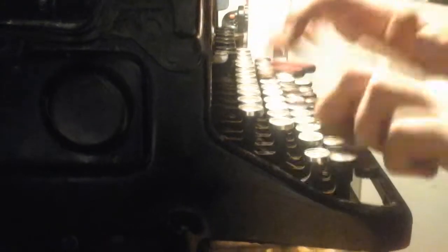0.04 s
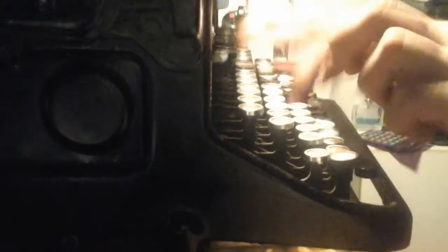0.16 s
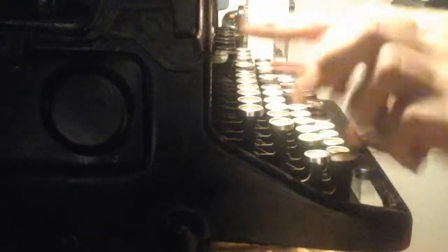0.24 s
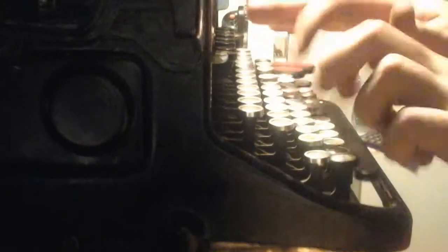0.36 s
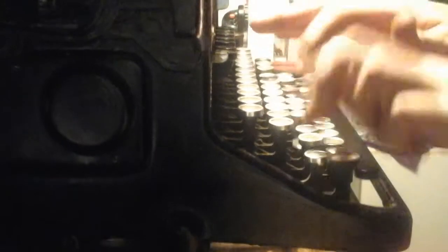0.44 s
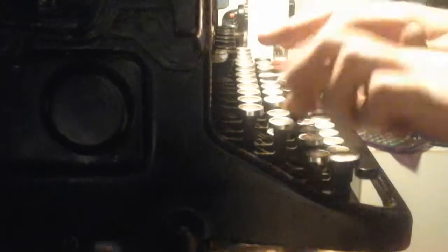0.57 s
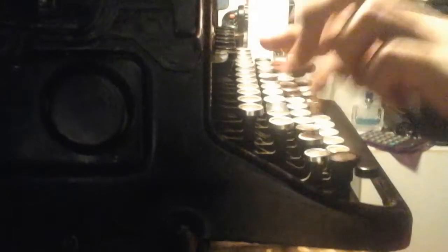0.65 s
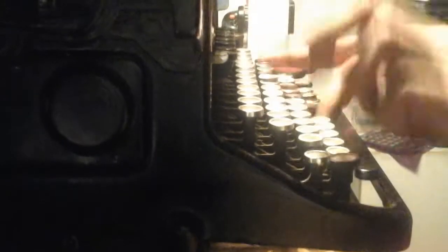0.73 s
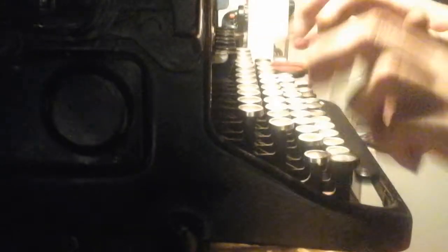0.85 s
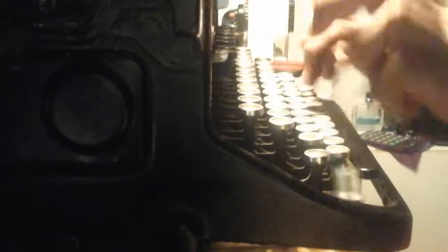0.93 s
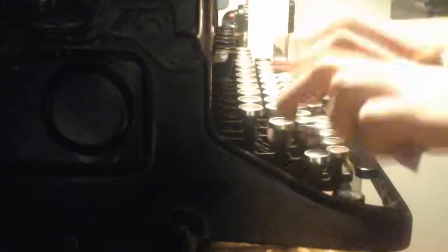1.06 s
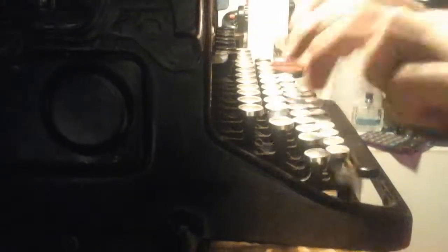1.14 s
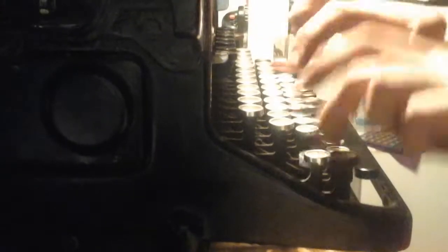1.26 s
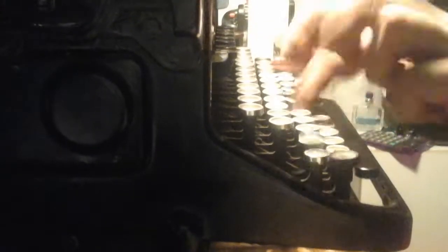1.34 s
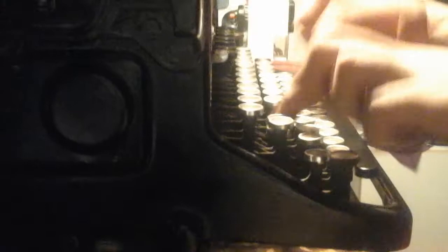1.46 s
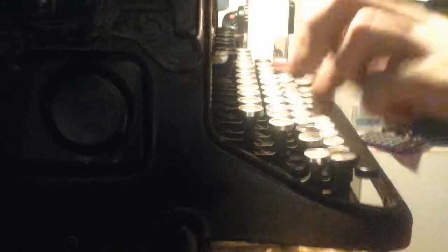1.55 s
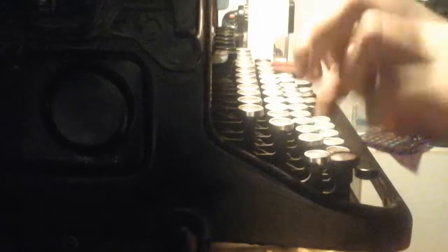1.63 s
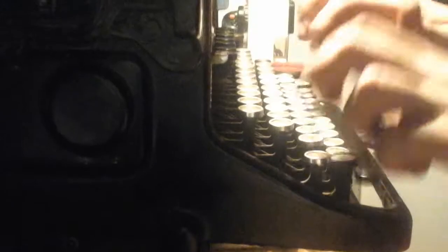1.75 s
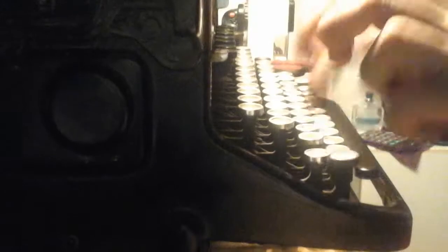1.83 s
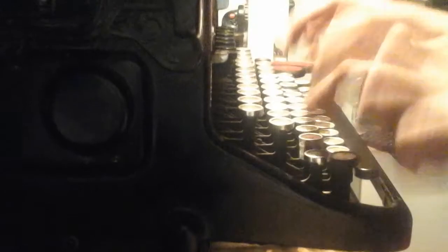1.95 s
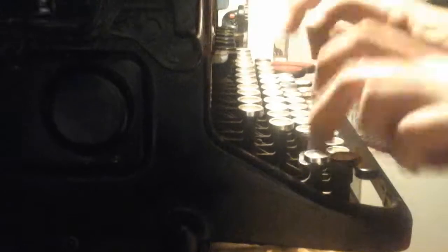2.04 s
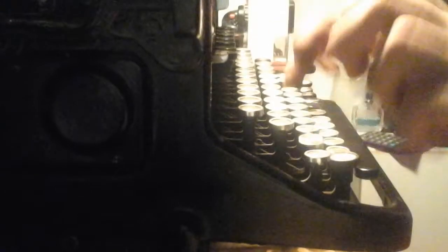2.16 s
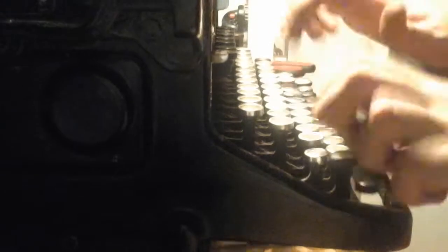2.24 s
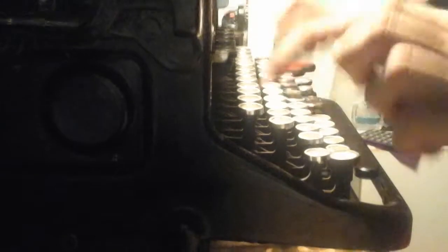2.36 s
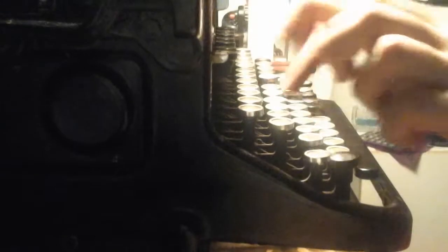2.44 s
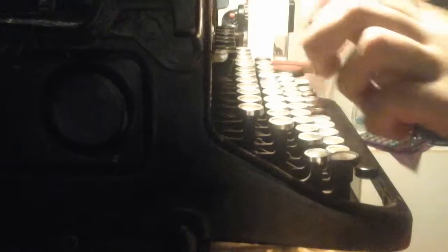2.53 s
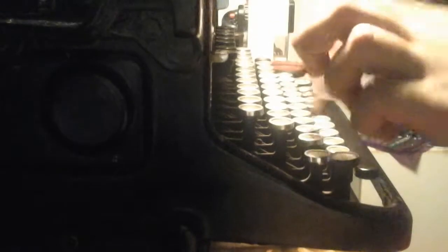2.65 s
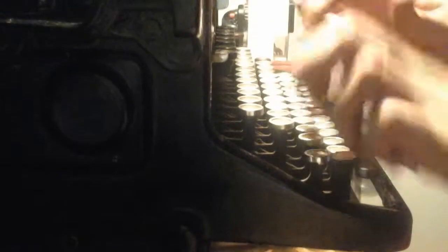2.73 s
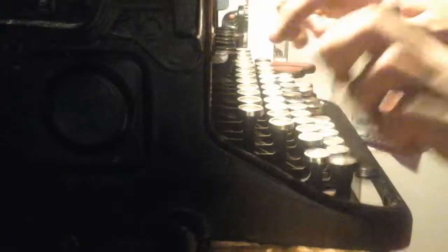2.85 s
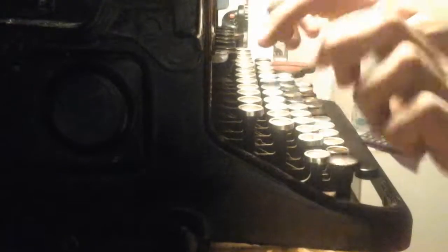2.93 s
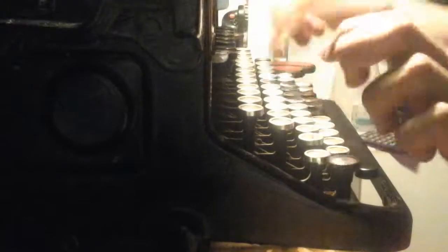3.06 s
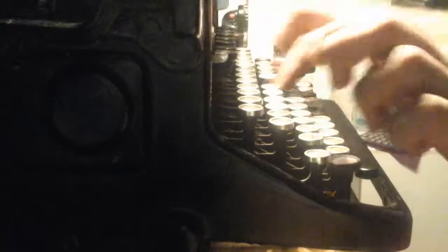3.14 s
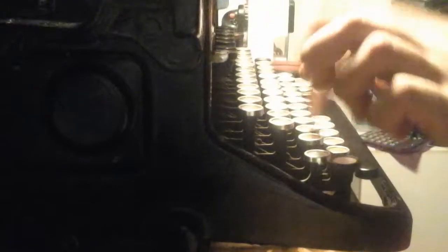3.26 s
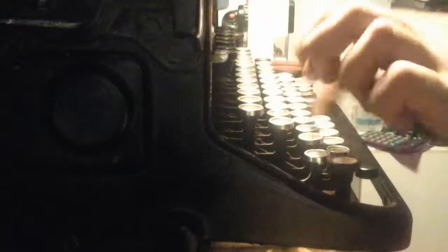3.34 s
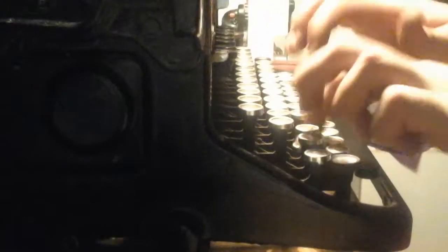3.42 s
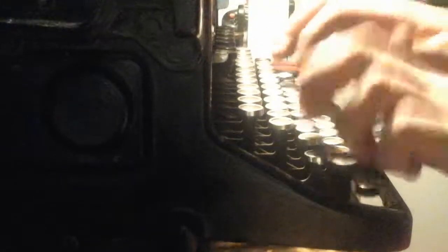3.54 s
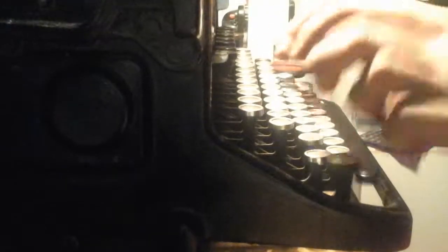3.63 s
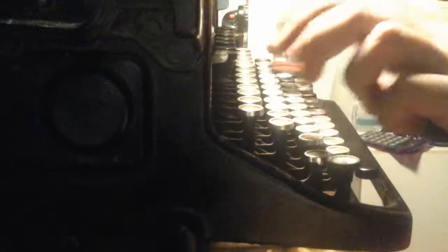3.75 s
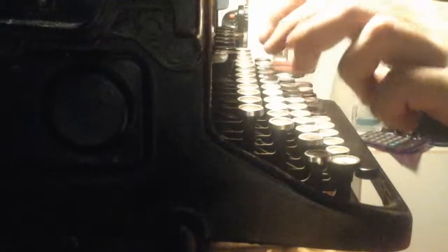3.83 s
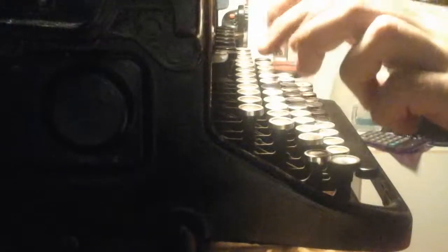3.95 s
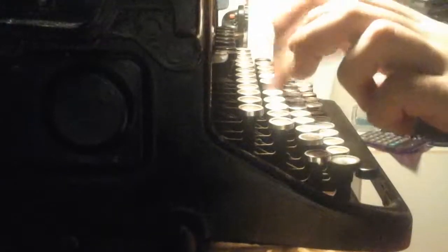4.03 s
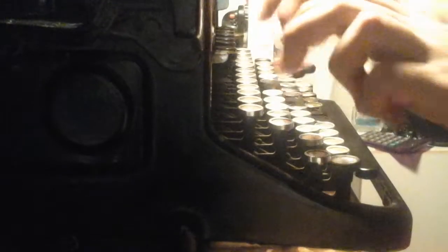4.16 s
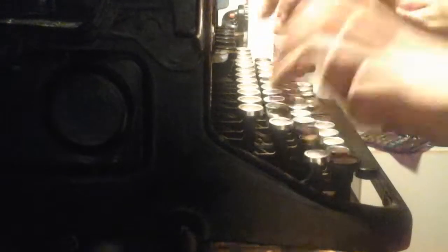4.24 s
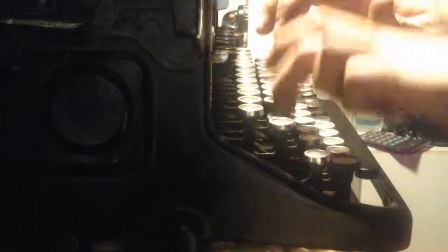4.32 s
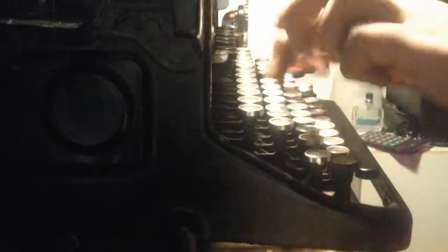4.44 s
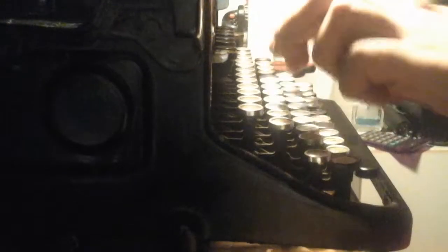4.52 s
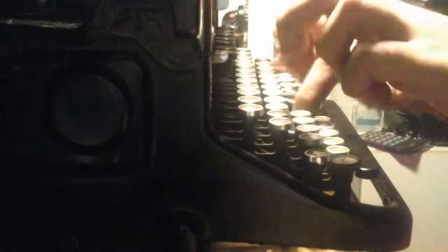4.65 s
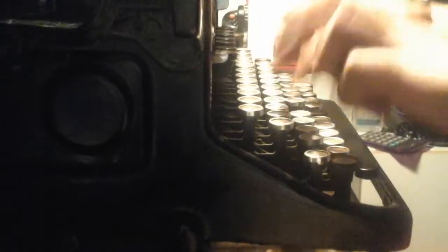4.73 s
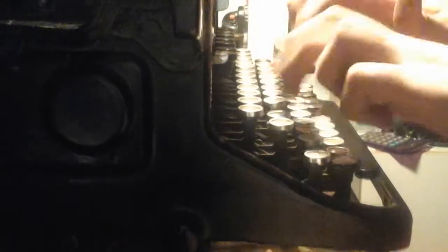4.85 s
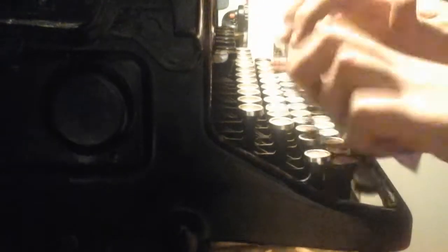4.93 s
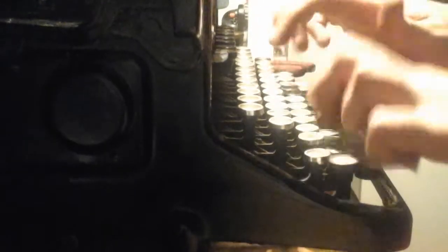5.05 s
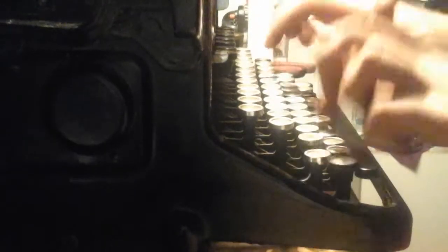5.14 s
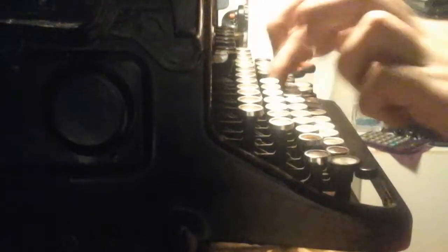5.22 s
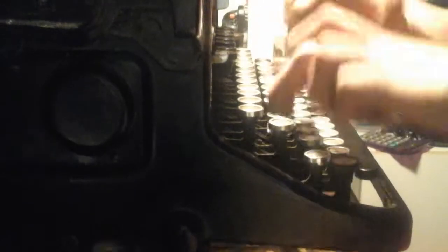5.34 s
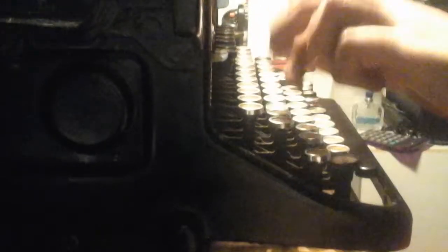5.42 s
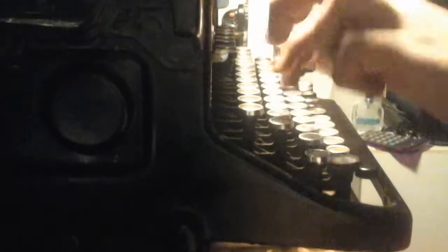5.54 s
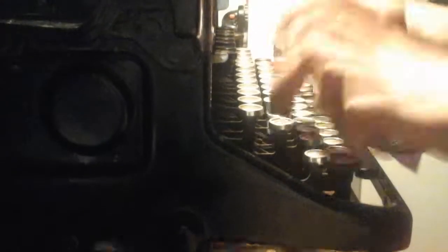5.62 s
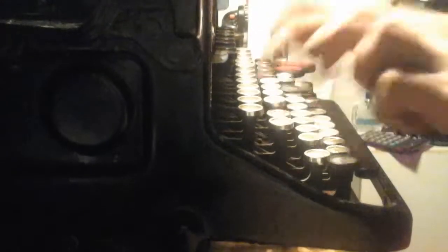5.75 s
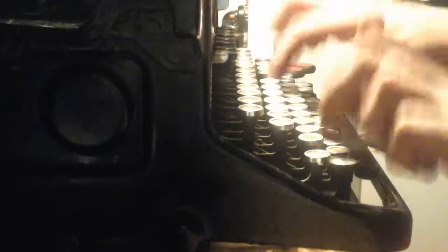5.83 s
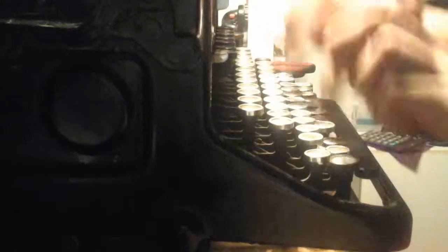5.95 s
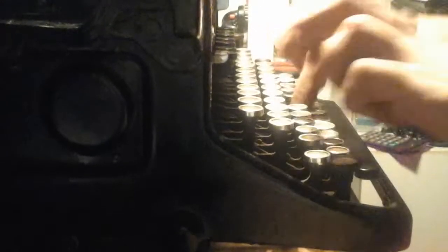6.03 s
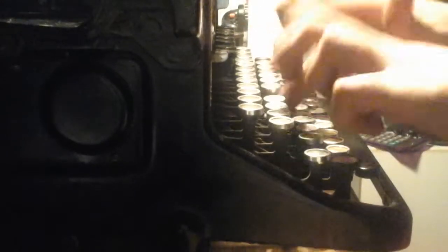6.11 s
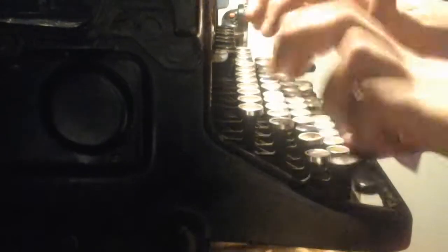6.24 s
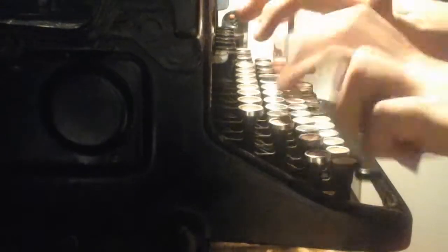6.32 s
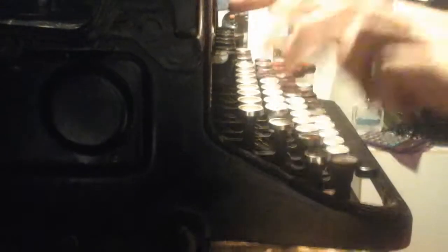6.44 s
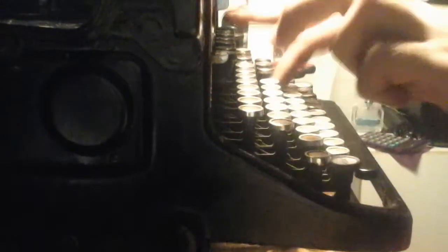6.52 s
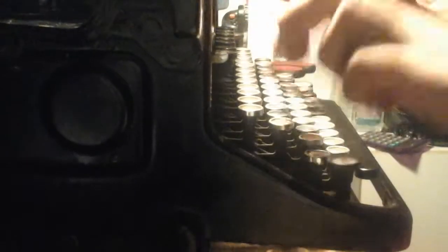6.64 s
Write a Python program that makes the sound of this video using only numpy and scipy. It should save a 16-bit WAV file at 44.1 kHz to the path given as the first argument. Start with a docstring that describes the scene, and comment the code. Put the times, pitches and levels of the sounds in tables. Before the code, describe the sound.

Fast, uneven clatter of an old iron typewriter, typebars snapping on the platen over deep wooden thumps, with ringing space strokes and brief gaps.

```python
"""Fast typing on a heavy manual typewriter, heard from very close beside its iron frame in a small room.
Each letter's typebar clacks on the platen, snaps, sizzles and rings at its own pitch; thuds rock desk and frame.
The space bar rings and bounces between words, levers knock and tick, the shift drops once, loose parts rattle.
Every blow sums decaying sine modes of the struck body; noise-made reflections and a low rumble add the room."""
import sys
import numpy as np
from scipy import signal
from scipy.fft import rfft, irfft
from scipy.io import wavfile
from scipy.ndimage import uniform_filter1d

SR = 44100
rng = np.random.default_rng(int(sys.argv[2]) if len(sys.argv) > 2 else 0)


def master(y):
    """Save y as 16-bit WAV."""
    cut = np.clip(np.atleast_2d(y).T, -1, 1)
    pcm = np.round(cut * 32767)  # scale
    wavfile.write(sys.argv[1], SR, pcm.astype(np.int16))


N = 294588
TIME = np.arange(N) / SR   # s
# In all tables rel_db is a relative level, trimmed or normalised where it is played.


def from_db(db):
    """Decibels to amplitude ratio."""
    return 10 ** (np.asarray(db) / 20)


def rms_one(x):
    """Scale to unit RMS."""
    return x / np.sqrt(np.mean(x ** 2, axis=-1, keepdims=True) + 1e-20)


def at_hz(points, hz):
    """Interpolate (Hz, value) points along log frequency."""
    points_hz, values = np.array(points).T
    return np.interp(np.log(hz), np.log(points_hz), values)


def dense_modes(colour, t60, count):
    """Many unrelated steel modes that share a colour; t60 (s) holds at 1 kHz and higher modes die sooner."""
    spread = np.exp(rng.normal(0, 1, count) / count)
    hz = np.geomspace(colour[0][0], colour[-1][0], count) * spread
    khz = hz / 1000
    db = at_hz(colour, hz) + 10 * np.log10(khz)   # log spacing: each mode covers a band in proportion to hz
    return np.column_stack([hz, db, t60 / khz ** 0.64])


def rings(modes, contact_s, length_s, aim, count):
    """One ring per blow, of unit strength; each weights the modes anew, the more alike the steadier its aim."""
    hz, db, t60 = np.transpose(modes)[:, :, None]
    t = np.arange(int(length_s * SR)) / SR
    waves = from_db(db - 60 * t / t60) * np.sin(2 * np.pi * hz * t)
    weights = np.cbrt(aim + rng.standard_normal((count, len(modes))))
    onset = 1 - np.exp(-(t / contact_s) ** 2)
    fade_out = np.minimum(1, 10 * (1 - t / length_s))
    out = weights @ waves * onset * fade_out
    power = uniform_filter1d(out ** 2, SR // 200, axis=1, mode="constant")   # 5 ms window
    return out / np.sqrt(power.max(axis=1, keepdims=True))


def play(times, db, modes, contact_s, length_s, aim=0):
    """Strike a body at the given times and levels."""
    out = np.zeros(N + 2 * SR)   # 1 s margin at each end
    blows = rings(modes, contact_s, length_s, aim, count=len(times))
    for s, gain, ring in zip(times, from_db(db), blows):
        start = SR + int(np.clip(s * SR, -SR, N))
        out[start:start + len(ring)] += gain * ring
    return out[SR:SR + N]


def rebounding(times, db, gap_s, loss_db, count):
    """Turn each blow into count blows at uneven gaps, each loss_db weaker (stronger if negative)."""
    gaps = gap_s * (.5 + rng.random((len(times), count)))
    delays = np.cumsum(gaps, axis=1) - gaps[:, :1]
    levels_db = db[:, None] - loss_db * np.arange(count)
    return (times[:, None] + delays).ravel(), levels_db.ravel()


def gather(*blows):
    """Join several kinds of blow, each given as times and levels, into columns."""
    return np.hstack([np.broadcast_arrays(*blow) for blow in blows])


# background spectrum: freq_hz, rel_db
ROOM_NOISE_SPECTRUM = [(25, -13.5), (60, -1.5), (130, 8), (220, -2.5), (400, -21.5), (1000, -41),
                       (2500, -48.5), (7000, -59), (13000, -69.5)]


def room_noise(level_db):
    """A low, steady background rumble: noise shaped in frequency, at level_db RMS."""
    hz = np.maximum(np.arange(N // 2 + 1) * SR / N, 1)
    shaped = rfft(rng.standard_normal(N)) * from_db(at_hz(ROOM_NOISE_SPECTRUM, hz))
    return from_db(level_db) * rms_one(irfft(shaped, N))


# room decay: freq_hz, t60_s
ROOM_DECAY = [(80, .55), (500, .33), (2500, .25), (8000, .26)]


def room(x):
    """Diffuse reflections: octave bands of noise, the bass dying away slowest."""
    t = TIME[:SR // 2]
    response = 0
    for hz in 62.5 * 2 ** np.arange(8):
        band = signal.butter(2, [hz / np.sqrt(2), hz * np.sqrt(2)], "band", fs=SR, output="sos")
        decay = from_db(-60 * t / at_hz(ROOM_DECAY, hz))
        response = response + signal.sosfilt(band, rng.standard_normal(len(t))) * decay
    response = response * (1 - np.exp(-(t / 0.016) ** 2))   # gradual build-up
    response = response / np.sqrt(2 * np.sum(response ** 2))
    eased = x * np.minimum(1, TIME / .01) ** 2
    return signal.fftconvolve(eased, response)[:N]


# keys bottoming, keys let go, carriage stopping: thud_s, desk_rel_db, frame_rel_db
THUD_BLOWS = [(-0.004, -4, -11), (0.017, -7, -7.5), (0.045, -9.5, -11.5), (0.091, -8.5, -13),
              (0.127, -6, -9.5), (0.213, -5, -17.5), (0.262, -20.5, -9), (0.317, -22.5, -18),
              (0.347, -8, -9.5), (0.382, -16.5, -9), (0.417, -7.5, -32.5), (0.461, -7.5, -11),
              (0.524, -9, -18), (0.577, -6.5, -11.5), (0.632, -9.5, -9), (0.682, -17, -9.5),
              (0.734, -6.5, -9), (0.778, -14, -6.5), (0.842, -7, -8.5), (0.885, -7, -10),
              (0.922, -8, -13.5), (0.967, -6.5, -5.5), (1.036, -2.5, -5), (1.077, -8, -30.5),
              (1.133, -11, -12), (1.217, -7, -12.5), (1.268, -8, -10.5), (1.311, -15, -11),
              (1.396, -8.5, -12.5), (1.421, -34, -9.5), (1.495, -8.5, -13), (1.539, -7.5, -14.5),
              (1.629, -11, -7.5), (1.676, -11.5, -14.5), (1.756, -16.5, -6), (1.825, -11.5, -17),
              (1.872, -12, -11), (1.903, -12, -14), (1.946, -31, -9.5), (2.058, -6.5, -9),
              (2.116, -8.5, -13.5), (2.167, -6, -10.5), (2.212, -5.5, -9.5), (2.291, -8, -7),
              (2.341, -6.5, -6.5), (2.396, -9, -8.5), (2.456, -4.5, -10), (2.521, -18, -10),
              (2.571, -6, -11.5), (2.609, -12.5, -8), (2.65, -32.5, -4), (2.688, -10, -14), (2.758, -4, -7),
              (2.818, -9, -8), (2.846, -13, -10), (2.895, -12, -11.5), (2.932, -6.5, -11),
              (2.971, -14.5, -13.5), (3.002, -16, -18), (3.153, -18, -5.5), (3.183, -16.5, -6),
              (3.224, -17.5, -11.5), (3.286, -5, -10), (3.331, -14, -6.5), (3.366, -14, -8.5),
              (3.451, -30, -9), (3.475, -4.5, -9), (3.521, -13.5, -27), (3.569, -4.5, -7.5),
              (3.61, -9, -6.5), (3.653, -13, -17.5), (3.687, -12.5, -11.5), (3.722, -12, -14.5),
              (3.753, -14, -8), (3.8, -20.5, -16), (4.108, -10, -8), (4.14, -18, -7.5), (4.246, -5.5, -9.5),
              (4.306, -11, -13.5), (4.34, -27, -3.5), (4.38, -20.5, -10), (4.45, -6.5, -8.5),
              (4.494, -29, -6.5), (4.536, -9, -15.5), (4.608, -4, -5.5), (4.666, -9, -13),
              (4.704, -19.5, -5.5), (4.762, -17.5, -14), (4.822, -5, -12.5), (4.852, -34.5, -7),
              (4.886, -17, -17), (4.931, -6, -11.5), (4.976, -11.5, -6), (5.057, -13, -8), (5.1, -17, -6.5),
              (5.142, -12.5, -5), (5.228, -7, -25.5), (5.265, -11, -10), (5.345, -7.5, -11),
              (5.383, -14.5, -11), (5.418, -14.5, -11.5), (5.466, -6.5, -17), (5.504, -11, -13.5),
              (5.57, -12.5, -9.5), (5.6, -7.5, -12.5), (5.647, -9.5, -10.5), (5.694, -8.5, -12.5),
              (5.741, -10.5, -9), (5.787, -15, -20.5), (5.826, -6.5, -9.5), (5.861, -8.5, -16),
              (5.904, -8.5, -14), (5.947, -9.5, -9.5), (5.978, -8.5, -16.5), (6.013, -16, -7.5),
              (6.053, -5.5, -10.5), (6.083, -11, -7), (6.149, -12.5, -9), (6.199, -9, -6),
              (6.278, -5, -9.5), (6.324, -14, -11), (6.38, -6.5, -13), (6.409, -6.5, -7.5),
              (6.443, -16, -8), (6.478, -11, -27), (6.528, -3.5, -9.5), (6.578, -10.5, -12),
              (6.643, -18, -5)]


def shake(times, fall_db_per_s):
    """How hard the machine is shaking (dB): the largest remainder of the earlier thuds, each falling steadily."""
    s, desk_db, frame_db = np.transpose(THUD_BLOWS)
    age_s = times[:, None] - s
    left_db = np.maximum(desk_db, frame_db) - fall_db_per_s * age_s
    return np.where(age_s > 0, left_db, -100).max(axis=1)


# colour of knocks: freq_hz, rel_db_per_hz
KNOCK_COLOUR = [(230, 11.5), (330, 11), (450, 2), (620, 8.5), (760, -3), (960, 2), (1200, -6.5), (1480, -3),
                (1800, -21.5), (2250, -18.5), (3200, -31), (4500, -33.5)]
# colour of dry metal ticks: freq_hz, rel_db_per_hz
TICK_COLOUR = [(600, 10), (1000, 10), (1500, 10.5), (2400, 6.5), (3300, 2.5), (4300, 2), (5200, -7),
               (6400, -6.5), (7300, 7), (8500, -12), (13000, -31)]


def loose_parts():
    """Springs and links chatter at random times, as hard as the machine is being shaken."""
    times = rng.uniform(0, TIME[-1], size=1150)
    sizes_db = shake(times, fall_db_per_s=180) + rng.uniform(-9, 3, len(times))
    link_modes = dense_modes(KNOCK_COLOUR, t60=0.026, count=110)
    spring_modes = dense_modes(TICK_COLOUR, t60=0.0088, count=90)
    links = play(times, sizes_db - 21.5, link_modes, contact_s=.003, length_s=0.029)
    springs = play(times, sizes_db - 45.5, spring_modes, contact_s=0.0015, length_s=.018)
    return links + springs


# colour of small steel links: freq_hz, rel_db_per_hz
JINGLE_COLOUR = [(2500, -1.5), (3300, -2.5), (4300, 2), (5100, -11.5), (6300, -1), (7300, 3), (8200, -11)]


def jingle():
    """Small steel links tinkle at random times, following the shaking with uneven strength."""
    times = rng.uniform(0, TIME[-1], size=260)
    extra_db = 2.4 * np.minimum(rng.exponential(1, len(times)), 3)
    sizes_db = shake(times, fall_db_per_s=132) + extra_db
    modes = dense_modes(JINGLE_COLOUR, t60=.025, count=90)
    return play(times, sizes_db - 62.5, modes, contact_s=.001, length_s=0.029)


# shift dropping onto its stop: hit_s, rel_db
SHIFT_HITS = [(1.0288, -11.5), (1.034, -10), (1.04, -17.5), (1.046, -21.5), (1.051, -25)]
# colour of that clatter: freq_hz, rel_db_per_hz
DROP_COLOUR = [(220, 18.5), (380, 11.5), (700, -4.5), (950, 9), (1250, -14), (1500, -3), (1800, -2.5),
               (2400, -9), (2700, -20.5), (4400, -28.5), (5500, -51)]
# iron frame modes: freq_hz, rel_db, t60_s
FRAME_MODES = [(137.7, -3, 0.11), (159.9, 1.5, 0.12), (175, 1.5, 0.11), (192.5, -1.5, 0.093),
               (234.6, -7, 0.11), (251.2, -14.5, 0.1), (312.4, -19, 0.092), (350.5, -25, 0.14)]


def shift():
    """A heavy, hard clatter of dense modes, after which the frame booms on."""
    s, db = np.transpose(SHIFT_HITS)
    # the carriage settles
    boom = play(s[:1] + 0.038, [-9], FRAME_MODES, contact_s=0.019, length_s=.2, aim=0.91)
    drop_modes = dense_modes(DROP_COLOUR, t60=0.03, count=120)
    return boom + play(s, db - 6.5, drop_modes, contact_s=0.0014, length_s=0.088)


# levers knocking, typebars falling back on their rest: hit_s, knock_rel_db, tick_rel_db
LEVER_HITS = [(0.2097, -35, -66), (0.2225, -30.0, -76), (0.3431, -27.5, -69), (0.3833, -35, -54.5),
              (0.4248, -26.5, -64.5), (0.4629, -31, -66.5), (0.589, -35.5, -62.5), (0.6128, -31.5, -61),
              (0.7556, -23.5, -52.5), (0.8361, -30, -67), (0.8554, -30.5, -65.5), (0.8881, -31, -58.5),
              (0.9015, -30, -62), (0.9867, -28, -65), (1.1254, -26, -63.5), (1.251, -32.5, -64),
              (1.418, -29, -57.5), (1.7562, -25.5, -65.5), (1.7971, -29.5, -58.5), (1.8843, -30, -71),
              (1.9179, -26, -56), (2.0511, -24.5, -64), (2.111, -25.5, -69.0), (2.155, -33, -61),
              (2.299, -22, -66.0), (2.3471, -24.5, -55.5), (2.4352, -25.5, -59), (2.5433, -26, -67),
              (2.5851, -27, -73), (2.6021, -26.0, -50), (2.6278, -25.5, -70), (2.7474, -31, -67),
              (2.7837, -29.0, -52.5), (2.8088, -28.5, -70.5), (2.8208, -23, -72), (2.945, -32, -75.5),
              (2.9912, -28, -69), (3.092, -37, -71.0), (3.143, -28, -71), (3.2368, -38, -57),
              (3.3143, -28.5, -53), (3.4419, -30.0, -52.5), (3.4525, -31.5, -54), (3.5653, -40, -61.5),
              (3.6052, -32, -58.0), (3.6576, -31.5, -67), (3.7217, -24, -69), (3.7625, -27, -57),
              (3.877, -39.5, -62), (4.098, -36.5, -82), (4.194, -35, -63), (4.2697, -34, -59),
              (4.2835, -32.5, -61), (4.3044, -29, -69), (4.3139, -29.5, -66), (4.4046, -31, -60),
              (4.4767, -26.5, -57.5), (4.5551, -28, -64.0), (4.631, -23, -57.5), (4.6586, -24, -63),
              (4.675, -26.5, -63), (4.7668, -31.5, -55), (4.8195, -24.5, -60), (4.9315, -35, -56),
              (4.9712, -33.0, -58), (4.9817, -31.5, -76), (5.0272, -30.5, -69.5), (5.1075, -20, -67),
              (5.13, -27.5, -52.5), (5.2365, -36.5, -59.5), (5.265, -28.5, -68.5), (5.3742, -28.5, -71),
              (5.4527, -28.5, -68.0), (5.4786, -31.5, -64.5), (5.5256, -29.5, -63.5), (5.5937, -35, -58.5),
              (5.6073, -32.0, -66.5), (5.6256, -32.5, -63.5), (5.6891, -29, -58.5), (5.766, -29, -50),
              (5.8204, -26, -62), (5.8456, -34, -62.5), (5.902, -35, -65.5), (5.9927, -25.5, -50),
              (6.048, -20, -52), (6.1173, -31.5, -67), (6.1389, -27.5, -56), (6.2274, -30, -65.5),
              (6.2628, -32, -58.5), (6.2817, -30.0, -63), (6.294, -23.5, -59.5), (6.3053, -28.5, -56),
              (6.357, -29.0, -57.5), (6.4823, -37, -62.0), (6.5273, -34, -68), (6.5383, -39.5, -57),
              (6.6144, -29.0, -60)]


def levers():
    """Short knocks through the frame, each tipped by a dry metal tick."""
    s, knock_db, tick_db = np.transpose(LEVER_HITS)
    knock_modes = dense_modes(KNOCK_COLOUR, t60=.026, count=110)
    tick_modes = dense_modes(TICK_COLOUR, t60=0.0079, count=90)
    knock = play(s - .001, knock_db + 1.5, knock_modes, contact_s=0.0022, length_s=.05)
    tick = play(s, tick_db + 11.0, tick_modes, contact_s=.0012, length_s=.02)
    return knock + tick


# spaces between words: spring_back_s, held_s (before that), ring_rel_db, buzz_rel_db
SPACE_STROKES = [(0.006, 0.051, -22.5, -42.5), (0.407, 0.063, -21.5, -44), (0.924, 0.079, -20.5, -41.5),
                 (1.831, 0.085, -23.5, -44), (2.374, 0.082, -17.5, -40), (2.902, 0.08, -18.5, -41),
                 (3.69, 0.078, -18.5, -40.5), (5.061, 0.081, -19.5, -39.5), (6.381, 0.068, -21, -44)]
# rattle at each return of the bar: after_return_s, rel_db
RATTLE_PINGS = [(-.008, -8), (0, 1), (.013, -5.5), (.03, -8.5), (0.047, -6), (.083, -12)]
# space bar spring modes: freq_hz, rel_db, t60_s
SPRING_MODES = [(1425, 4, 0.053), (1750, -6, 0.073), (2220, -4, 0.016), (2260, -0.5, 0.038),
                (2375, -6.5, 0.026)]


def bar_spring():
    """The space bar's spring rattles in short pings, one as it goes down and a quick run as it comes back."""
    up, held, _, buzz_db = np.transpose(SPACE_STROKES)
    down_ping = (up - held - .008, buzz_db - 7)
    return_pings = [(up + after_s, buzz_db + db) for after_s, db in RATTLE_PINGS]
    s, db = gather(down_ping, *return_pings)
    return play(s - .001, db - .5, SPRING_MODES, contact_s=0.0012, length_s=0.038, aim=1.7)


SPACE_BOUNCE_S, SPACE_BOUNCE_LOSS_DB = .044, 3   # per bounce
# space bar modes: freq_hz, rel_db, t60_s
BAR_MODES = [(568.2, -7.5, 0.18), (590.4, -3.5, 0.069), (520, -9.5, 0.039), (640, -4, 0.029),
             (823, -21.5, .06), (957, -20, .04), (1280, -30.5, .043)]
# colour of metal chatter: freq_hz, rel_db_per_hz
BUZZ_COLOUR = [(700, 7.5), (1000, 13.5), (1450, 9.5), (1800, 1), (2050, 0.5), (2250, 10.5), (2420, 0),
               (2600, -12), (2800, -11.5), (3300, -29)]


def space_bar():
    """The long bar goes down, springs back and bounces twice; each blow rings and chatters against the stop."""
    up, held, up_ring_db, up_buzz_db = np.transpose(SPACE_STROKES)
    down = (up - held + 0.0033, up_ring_db - 1.0, up_buzz_db - 4.5)
    bounces = []
    for k in (1, 2):
        loss_db = k * SPACE_BOUNCE_LOSS_DB
        bounces.append((up + k * SPACE_BOUNCE_S, up_ring_db - loss_db, up_buzz_db - 4.5 - loss_db))
    s, ring_db, buzz_db = gather(down, (up, up_ring_db, up_buzz_db), *bounces)
    ring = play(s, ring_db - .5, BAR_MODES, contact_s=.005, length_s=.25, aim=1.3)
    chatter = rebounding(s - .001, buzz_db, gap_s=0.0066, loss_db=0.5, count=3)
    buzz_modes = dense_modes(BUZZ_COLOUR, t60=0.037, count=110)
    return ring + play(*chatter, buzz_modes, contact_s=0.0052, length_s=.05)


# desk modes: freq_hz, rel_db, t60_s
DESK_MODES = [(55.6, -18, 0.03), (70.2, -6, 0.13), (82.95, -1, 0.11), (100.06, -0.5, 0.12),
              (119.97, -1, .12)]


def thumps():
    """Soft, heavy jolts rock the desk and ring the frame, each a short lump of bass."""
    s, desk_db, frame_db = np.transpose(THUD_BLOWS)
    desk = play(s, desk_db - 2.0, DESK_MODES, contact_s=.012, length_s=.2, aim=.5)
    frame = play(s - .002, frame_db - .6, FRAME_MODES, contact_s=.012, length_s=.2, aim=.5)
    return desk + frame


# letters: platen_hit_s, clack_rel_db, snap_rel_db, sizzle_rel_db, typebar_pitch_hz, ring_rel_db
LETTERS = [(0.024, -32.5, -53.5, -62.5, 1630, -44), (0.127, -28.5, -50.5, -61.5, 1536, -39.5),
           (0.255, -25.5, -50, -57.5, 2275, -44), (0.509, -26.5, -53.5, -70, 1490, -42.5),
           (0.641, -28, -52.5, -64.5, 1757, -34.5), (0.776, -28.5, -51, -61.5, 1610, -43.5),
           (1.134, -31.5, -58, -64.5, 1890, -39.5), (1.3, -38, -57, -70, 1546, -47.5),
           (1.426, -32, -56.5, -67.5, 1340, -38), (1.558, -31.5, -68, -77, 1380, -51),
           (1.662, -31.5, -57, -69.5, 1583, -45), (1.948, -30.5, -56, -63, 1555, -45),
           (2.071, -32, -56, -65.5, 1373, -42), (2.196, -29.5, -53, -66, 1410, -42.5),
           (2.463, -25.5, -52, -62, 1510, -45), (2.648, -29, -51.5, -58.5, 1630, -46),
           (3.177, -31, -55.5, -63.5, 1530, -42.5), (3.358, -29.5, -53, -60, 1595, -43),
           (3.491, -26, -49.5, -59.0, 2005, -42.5), (4.132, -33, -57, -62.5, 1590, -45.5),
           (4.35, -34, -56.5, -63, 1508, -32.5), (4.503, -26.5, -51, -58, 1540, -44),
           (4.707, -30.5, -51, -57.5, 1490, -39), (4.858, -26.0, -52, -62, 1480, -31),
           (5.148, -26.5, -53.5, -64, 1410, -44), (5.273, -28, -52, -61.5, 1460, -45.5),
           (5.388, -27.5, -54.5, -63, 1420, -33), (5.491, -31, -53.5, -67, 2380, -47),
           (5.639, -33, -53, -68.5, 1610, -44), (5.724, -23.5, -53, -62.0, 2230, -42),
           (5.855, -29.5, -53, -61, 2250, -51), (5.947, -28, -50, -62.5, 1464, -36.5),
           (6.078, -26.5, -48.5, -58, 1536, -40.5), (6.178, -23, -48.5, -62.5, 1430, -42),
           (6.443, -23.5, -50.5, -62, 2053, -38), (6.561, -25, -48.5, -57.5, 2060, -53)]
# modes of one typebar: multiple_of_pitch, rel_db, t60_s
TYPEBAR_MODES = [(.459, 0.5, 0.078), (1.001, 4, 0.051), (1.339, -5.5, .049), (1.83, -12.5, 0.027)]


def typebar_rings():
    """Every typebar has its own length, so each letter rings briefly at a pitch of its own."""
    out = np.zeros(N)
    for s, *_, pitch_hz, db in LETTERS:
        modes = np.array(TYPEBAR_MODES) * [pitch_hz, 1, 1]
        out += play([s], [db], modes, contact_s=0.00075, length_s=.08, aim=3.3)
    return out


# colour of the platen clack: freq_hz, rel_db_per_hz
CLACK_COLOUR = [(280, 12), (450, 1.5), (650, 9), (800, -1.5), (980, 4), (1250, -6), (1500, -8),
                (1800, -11.5), (2300, -14), (2800, -18.5), (3500, -29)]
# colour of the steel snap: freq_hz, rel_db_per_hz
SNAP_COLOUR = [(1800, 8.5), (2700, 14.5), (3300, 3.5), (4400, 5.5), (5100, -3.5)]
# colour of the sizzle: freq_hz, rel_db_per_hz
SIZZLE_COLOUR = [(5100, -3.5), (5700, 2), (6300, 3), (7300, 7.5), (8200, -5), (9300, -21), (11200, -1),
                 (13000, -6.5)]


def typebars():
    """The bar brushes its guide on the way up, hits the platen with a clack, and the steel snaps and rebounds."""
    s, clack_db, snap_db, sizzle_db, *_ = np.transpose(LETTERS)
    snap_modes = dense_modes(SNAP_COLOUR, t60=0.14, count=150)
    clack_modes = dense_modes(CLACK_COLOUR, t60=.034, count=110)
    brush_modes = dense_modes(BUZZ_COLOUR, t60=.03, count=60)
    sizzle_modes = dense_modes(SIZZLE_COLOUR, t60=0.28, count=220)
    scrape_modes = dense_modes(SIZZLE_COLOUR, t60=.1, count=220)

    brushes = rebounding(s - .011, snap_db - 0.5, gap_s=0.0067, loss_db=-1.0, count=2)
    clacks = rebounding(s - .001, clack_db + 0.64, gap_s=.0065, loss_db=2.5, count=3)
    snaps = rebounding(s - .0005, snap_db + 3.5, gap_s=.0055, loss_db=4.0, count=6)
    sizzles = rebounding(s - .0005, sizzle_db + 1.5, gap_s=0.002, loss_db=3.0, count=7)

    brush = play(*brushes, brush_modes, contact_s=0.0018, length_s=.03)
    clack = play(*clacks, clack_modes, contact_s=0.0019, length_s=.08)
    snap = play(*snaps, snap_modes, contact_s=0.00029, length_s=.06)
    sizzle = play(*sizzles, sizzle_modes, contact_s=0.0033, length_s=.06)
    scrape = play(s - .008, sizzle_db - 7.5, scrape_modes, contact_s=.006, length_s=.03)
    return clack + brush, scrape + snap + sizzle


def scene():
    """Sum the machine, its room reflections and the background."""
    clack, snap = typebars()
    snap = snap + jingle()
    low = thumps()
    works = clack + typebar_rings() + levers() + loose_parts() + space_bar() + bar_spring() + shift()
    # the snap and the low thuds come back off the walls; clacks, levers and space bar much less
    to_room = from_db(-6.0) * snap + from_db(-17) * works + from_db(-6.5) * low
    return (low + works + snap + room(to_room) + room_noise(level_db=-35.5))[None]


CUTOFF_HZ = 15500   # 70 dB down from here up


def record(dry):
    """The deepest bass is thinned, peaks are rounded and the top is cut."""
    thinned = signal.sosfilt(signal.butter(4, 43, "high", fs=SR, output="sos"), dry)
    rounded = thinned / (1 + thinned ** 6) ** (1 / 6)
    return signal.sosfilt(signal.cheby2(12, 70, CUTOFF_HZ, fs=SR, output="sos"), rounded)


dry = scene()
out = record(dry)
master(out)
```